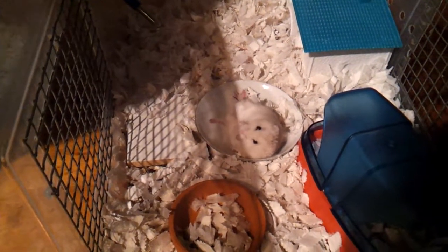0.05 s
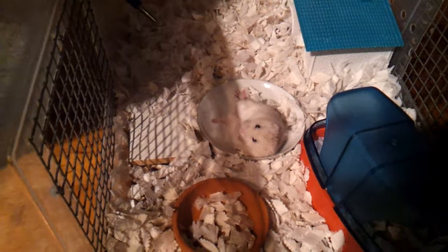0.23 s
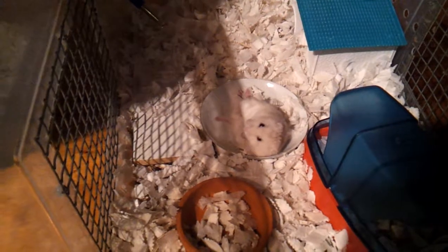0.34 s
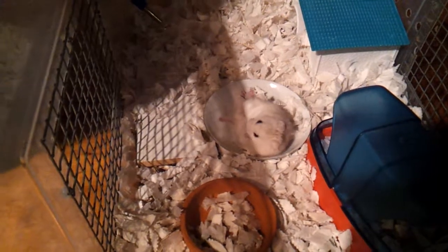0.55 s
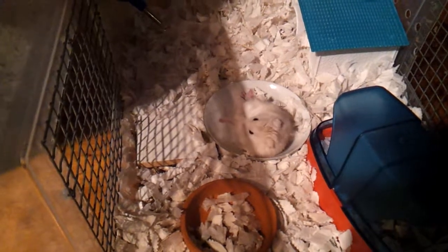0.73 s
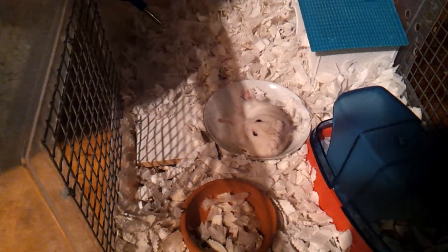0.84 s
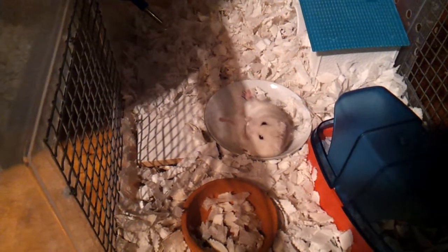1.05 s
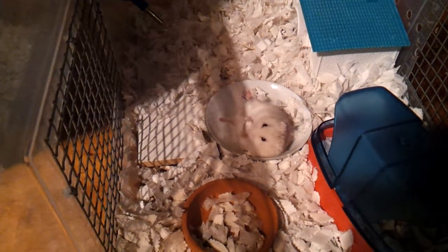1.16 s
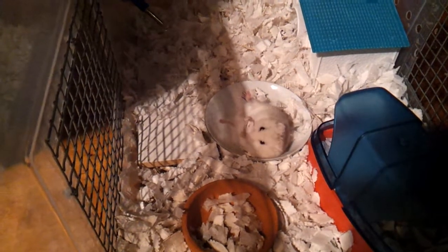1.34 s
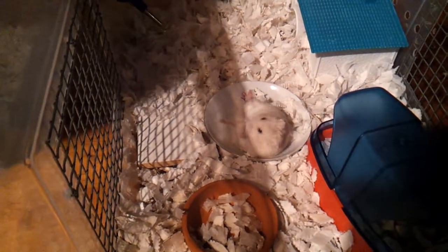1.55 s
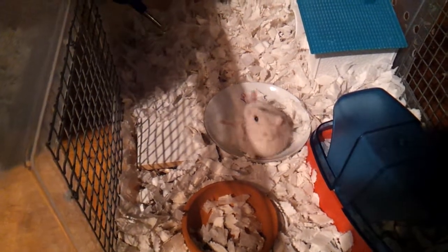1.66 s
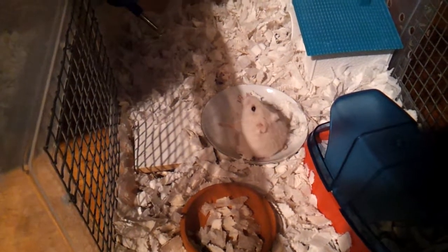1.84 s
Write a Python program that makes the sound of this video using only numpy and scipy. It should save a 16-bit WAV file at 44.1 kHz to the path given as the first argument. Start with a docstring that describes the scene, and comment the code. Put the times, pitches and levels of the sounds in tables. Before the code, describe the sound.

One sharp, close click, then faint hamster nibbling and a few small handling clicks.

```python
"""One hard, very short click close to the microphone, like a camera body being handled, stands out in a
quiet room. It excites heavily damped modes and overloads the input. A hamster feeds in a bowl in its
cage: faint nibbling and rustling come as bursts of noise, then a swish of friction as it turns.
Near the end comes a run of small handling clicks. Soft, low bumps and a rumble lie over a steady hiss."""
import sys
import numpy as np
from scipy import signal
from scipy.fft import rfft, irfft, next_fast_len
from scipy.io import wavfile

SR = 44100
rng = np.random.default_rng(int(sys.argv[2]) if len(sys.argv) > 2 else 0)


def file_out(sig):
    """Save sig as 16-bit WAV at sys.argv[1]."""
    # one column per channel
    cols = np.atleast_2d(sig).T
    # limit, then scale
    lim = np.clip(cols, -1, 1)
    pcm = np.round(lim * 32767).astype(np.int16)
    wavfile.write(sys.argv[1], SR, pcm)


N = 83790
CONTACT_RISE_S = .0003  # attack of small clicks and nibbles


def amp(db):
    """Amplitude grows tenfold for every 20 dB."""
    return 10 ** (np.asarray(db) / 20)


def unit(x):
    """Normalisation to an rms of 1."""
    return x / np.sqrt(np.mean(x ** 2) + 1e-20)


def curves(rows):
    """Linear interpolation: one value per sample for each column after the time."""
    times_s, *columns = np.transpose(rows)
    return [np.interp(np.arange(N) / SR, times_s, column) for column in columns]


def filtered(x, response):
    """Linear filtering multiplies the spectrum by a frequency response."""
    size = next_fast_len(N + SR // 2)
    return irfft(rfft(x, size) * response(np.fft.rfftfreq(size, 1 / SR)), size)[:N]


def noise(colour):
    """Spectral shaping: white noise follows (frequency_hz, gain_db) points, scaled to rms 1."""
    points_hz, gain_db = np.transpose(colour)
    response = lambda hz: amp(np.interp(np.log(hz + 1), np.log(points_hz + 1), gain_db))
    return unit(filtered(rng.standard_normal(N), response))


def since(start_s):
    """Seconds since an onset, zero before it."""
    return np.maximum(np.arange(N) / SR - start_s, 0)


def strike(t, rise_s, t60_s):
    """Damping: after a quick rise, the envelope falls by 60 dB in t60_s."""
    return (1 - np.exp(-t / rise_s)) * np.exp(-np.log(1000) * np.minimum(t / t60_s, 10))


def ring(start_s, modes, rise_s=CONTACT_RISE_S):
    """Modal superposition: a struck body sounds as damped sines (pitch_hz, level_db, t60_s)."""
    t = np.arange(SR // 20) / SR
    vibration = sum(amp(db) * strike(t, rise_s, t60_s) * np.sin(2 * np.pi * hz * t)
                    for hz, db, t60_s in modes)
    out = np.zeros(N + SR)
    out[round(start_s * SR):][:len(t)] = vibration
    return out[:N]


def hard_click():
    """Impulse response: one close click excites heavily damped modes that die in a few milliseconds."""
    # Modes of the click: pitch_hz, level_db, t60_s
    modes = [(540.0, -18.3, 0.0072), (860.0, -13.0, 0.0059), (1520.0, -5.7, 0.003), (2030.0, -11.5, 0.007),
             (2810.0, -8.0, 0.0035), (4220.0, -1.9, 0.0037), (4650.0, 6.1, 0.0035), (6070.0, 15.3, 0.0017),
             (7350.0, -2.2, 0.0037), (8210.0, 7.8, 0.0029), (9160.0, 3.5, 0.0044), (10550.0, 13.9, 0.0014),
             (13350.0, 11.4, 0.0013)]
    return ring(start_s=.2012, modes=modes, rise_s=.00025)


def handling_clicks(puff_t60_s=.011, knock_t60_s=.012, ring_t60_s=.008):
    """Impact excitation: each small handling click has a noise puff, a dull knock and a brief ring."""
    # Small hard impacts: start_s, puff_db, knock_db, ring_db, ring_hz
    impacts = [(1.4239, -61, -52.5, -70, 5700), (1.5804, -50, -49, -61, 4650),
               (1.6421, -48, -54, -53, 6400), (1.6840, -45.5, -47, -45, 5920),
               (1.7216, -43, -46, -40, 5670), (1.76, -39, -42.5, -50, 8060),
               (1.7655, -37, -39.5, -57, 5740), (1.7788, -40.5, -45.5, -44.5, 6050),
               (1.7897, -38, -38.5, -53, 4250), (1.8955, -48.5, -70, -34, 6100)]
    # Spectrum of the puffs: frequency_hz, gain_db
    puff_colour = [(300, -4), (1300, 7.5), (1700, -3.5), (2400, 2), (3100, -5.5), (4400, 0.5), (5700, 0.5),
                   (7000, -4.5), (8300, -6), (10000, -10), (15000, -22)]
    # Modes of the dull knock: pitch_hz, gain_db
    knock_modes = [(190, 1.5), (480, 4.5), (740, -1), (1300, -9.5)]
    body = [(hz, db, knock_t60_s) for hz, db in knock_modes]
    puff_envelope = sum(amp(puff_db) * strike(since(start_s), CONTACT_RISE_S, puff_t60_s)
                        for start_s, puff_db, *_ in impacts)
    out = puff_envelope * noise(puff_colour)
    for start_s, _, knock_db, ring_db, ring_hz in impacts:
        out += amp(knock_db) * ring(start_s, body)
        out += ring(start_s, [(ring_hz, ring_db, ring_t60_s)])
    return out


def nibbles(t60_s=.013):
    """Brief contacts have broad spectra: teeth on a husk give tiny, bright puffs of noise."""
    # Faint bites: start_s, level_db
    bites = [(0.161, -60), (0.1634, -54.5), (.2664, -50.5), (0.3115, -53.5), (0.3569, -57.5), (0.467, -57),
             (.5034, -58.5), (0.6612, -53), (.7166, -54), (.8244, -58.5), (.8350, -54), (.8454, -60.5),
             (.9388, -58)]
    # Spectrum of a bite: frequency_hz, gain_db
    colour = [(1000, -12), (3000, -5), (4500, -2), (6500, 2.5), (9500, -6), (15000, -13)]
    envelope = sum(amp(db) * strike(since(start_s), CONTACT_RISE_S, t60_s) for start_s, db in bites)
    return envelope * noise(colour)


def rustle(crinkles_per_s=60, crinkle_decay_s=.0012, crinkle_db=9):
    """Amplitude modulation: random crinkles roughen the soft rush of nibbling and shifting shavings."""
    # Envelope of the rustle: time_s, level_db
    envelope = [(0, -60.5), (.08, -75.5), (.17, -65), (.22, -65.5), (.29, -71), (.4, -71), (.48, -69.5),
                (.58, -70.5), (.71, -71.5), (.77, -72.5), (.83, -70.5), (1.05, -72.5), (1.25, -79.5),
                (1.5, -72), (1.75, -70), (1.86, -72)]
    # Spectrum of the rustle: frequency_hz, gain_db
    colour = [(500, -56), (2000, -17), (3200, -20.5), (4800, -12.5), (6200, -15.5), (8500, -22),
              (15000, -27)]
    impulses = (rng.random(N) < crinkles_per_s / SR) * rng.random(N)
    crinkles = signal.lfilter([1], [1, -np.exp(-1 / (crinkle_decay_s * SR))], impulses)
    level_db, = curves(envelope)
    return amp(level_db) * unit(noise(colour) * (1 + amp(crinkle_db) * crinkles))


def swish(half_width_hz=450):
    """Friction noise: a faint band rises in pitch as the animal turns in the bowl."""
    # Path of the noise band: time_s, level_db, centre_hz
    glide = [(1.42, -85.5, 2165), (1.50, -73.5, 2250), (1.585, -66, 2420), (1.65, -73.5, 2572),
             (1.75, -75, 2636), (1.86, -74, 2790), (1.9, -77, 2710)]
    level_db, centre_hz = curves(glide)
    low_noise = unit(filtered(rng.standard_normal(N), lambda hz: 1 / (1 + (hz / half_width_hz) ** 2)))
    carrier = np.sin(2 * np.pi * np.cumsum(centre_hz) / SR)  # shifts the noise up to the centre
    started = since(glide[0][0]) > 0
    return started * amp(level_db) * unit(low_noise * carrier)


def bumps(slow_push_db=-17, slow_pitch_ratio=.36):
    """Bipolar pulses, probably from handling: a low push and return over a slower one, with no ring."""
    # Soft bumps: centre_s, level_db, centre_hz
    pulses = [(.2120, -46.5, 24.8), (0.484, -44.5, 107), (0.572, -60, 109), (1.2077, -49.5, 166),
              (1.338, -56, 90), (1.4250, -47, 170), (1.436, -54.5, 70), (1.4577, -59.5, 91),
              (1.579, -51, 130), (1.7662, -28.5, 367), (1.7915, -29, 136), (1.8835, -49.5, 105)]
    t = np.arange(N) / SR
    push = lambda phase: phase * np.exp(.5 - .5 * np.minimum(np.abs(phase), 10) ** 2)
    out = np.zeros(N)
    for centre_s, level_db, centre_hz in pulses:
        phase = 2 * np.pi * centre_hz * (t - centre_s)
        out += amp(level_db) * (push(phase) + amp(slow_push_db) * push(phase * slow_pitch_ratio))
    return out


def background(hiss_db=-66):
    """The noise floor: a steady hiss, and a rumble that comes and goes."""
    # Spectrum of the hiss: frequency_hz, gain_db
    hiss_colour = [(25, -16), (80, 4), (160, -6), (450, -5), (1000, -9), (1700, -10.5), (3000, -14.5),
                   (5200, -15), (8000, -17.5), (15500, -18)]
    # Spectrum of the rumble: frequency_hz, gain_db
    rumble_colour = [(20, 11.5), (45, -7.5), (110, 1.5), (220, -13.5), (600, -13.5), (1500, -24.5),
                     (4000, -119)]
    # Envelope of the rumble: time_s, level_db
    rumble_envelope = [(0, -50), (.07, -61), (.17, -57.5), (.23, -60), (.36, -64.5), (.7, -65.5),
                       (1.05, -71), (1.55, -63.5), (1.72, -62), (1.8, -62), (1.9, -57)]
    rumble_db, = curves(rumble_envelope)
    return amp(hiss_db) * noise(hiss_colour) + amp(rumble_db) * noise(rumble_colour)


def scene():
    """Superposition: the sources add, close and dry, in one channel."""
    contacts = hard_click() + nibbles() + handling_clicks() + bumps()
    return (contacts + rustle() + swish() + background())[None]


def record(dry, clip_level=.98, low_cut_hz=26, top_hz=15600):
    """Saturation and band limiting: the hard click clips; the deepest bass and top treble are cut."""
    clipped = dry[0] / (1 + np.abs(dry[0] / clip_level) ** 6) ** (1 / 6)
    high_passed = filtered(clipped, lambda hz: 1j * hz / (low_cut_hz + 1j * hz))
    return filtered(high_passed, lambda hz: 1 / np.sqrt(1 + (hz / top_hz) ** 120))[None]


dry = scene()
out = record(dry)
file_out(out)
```